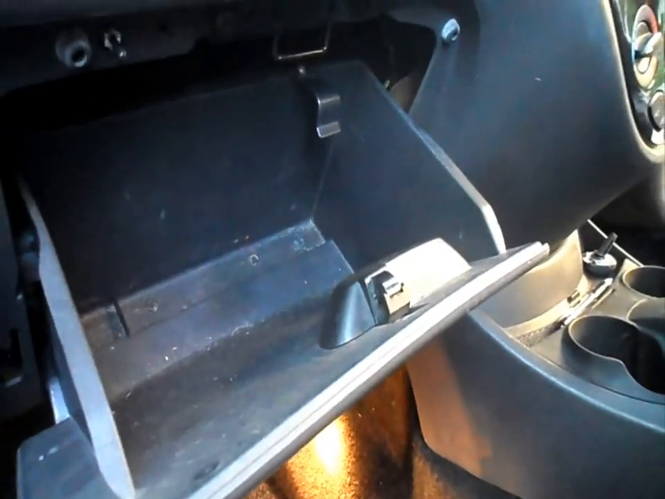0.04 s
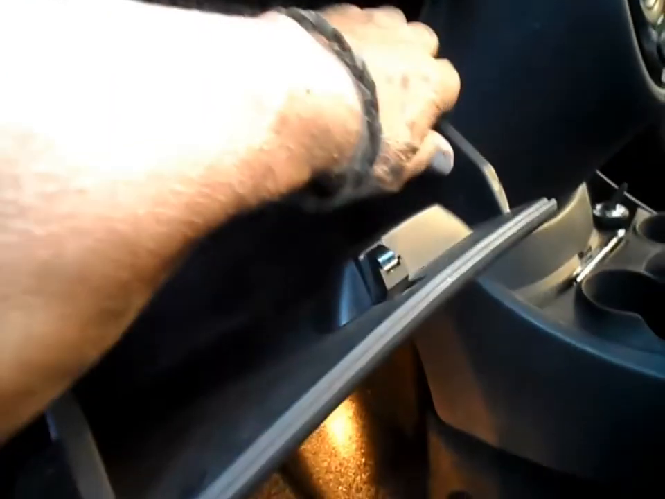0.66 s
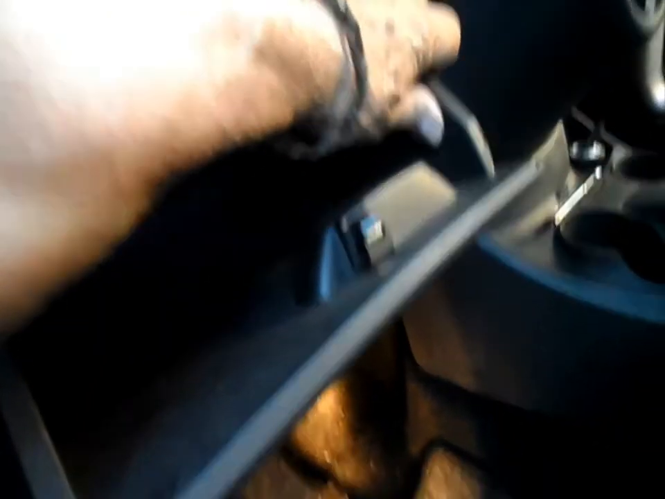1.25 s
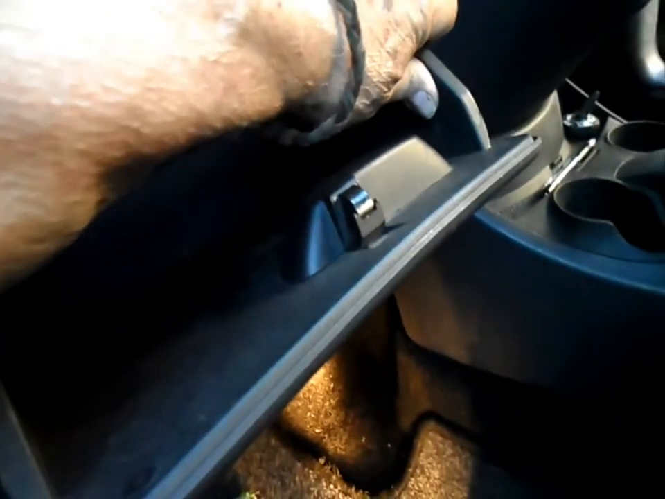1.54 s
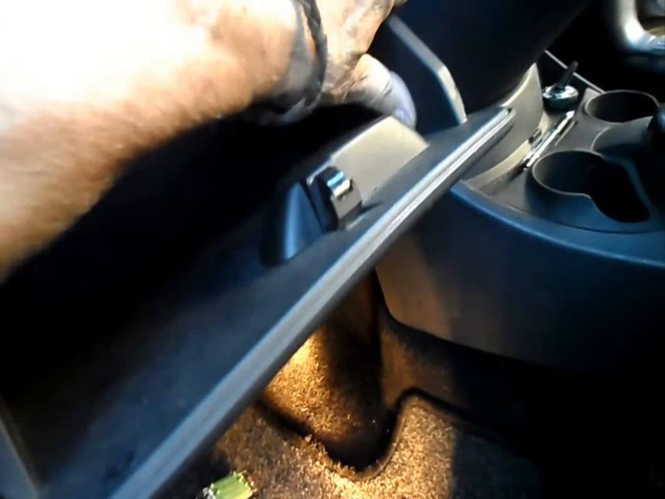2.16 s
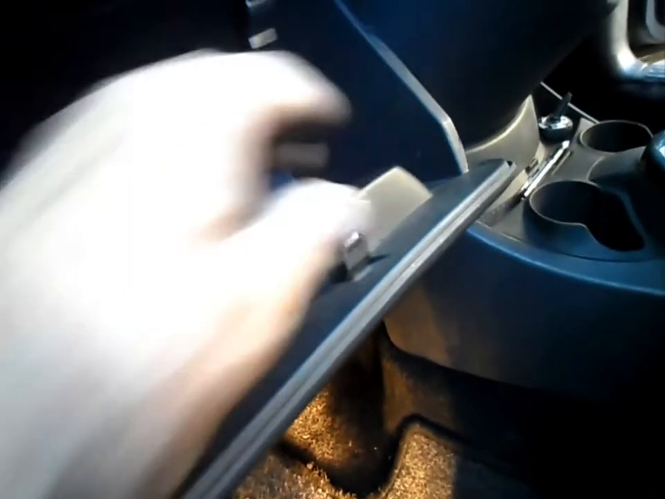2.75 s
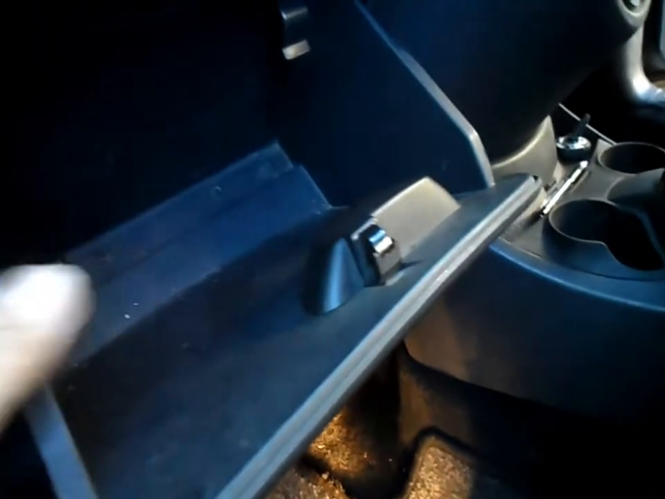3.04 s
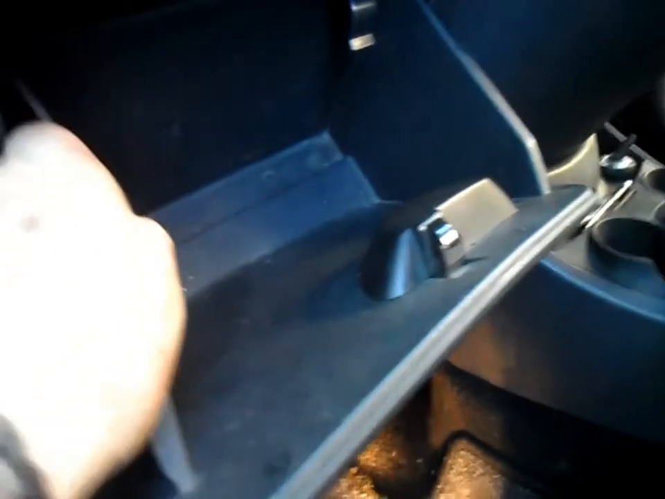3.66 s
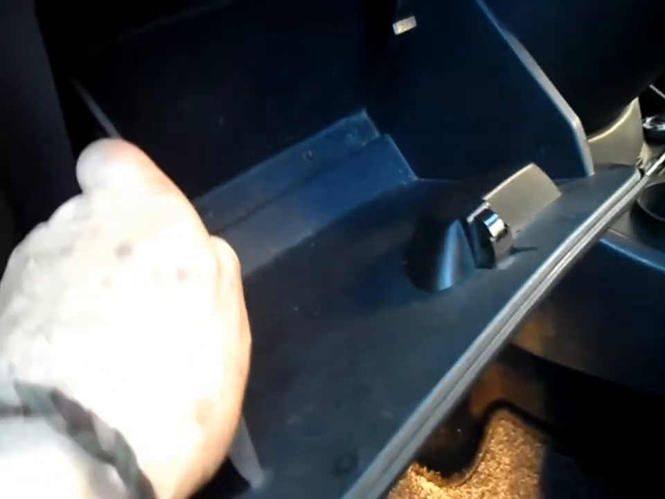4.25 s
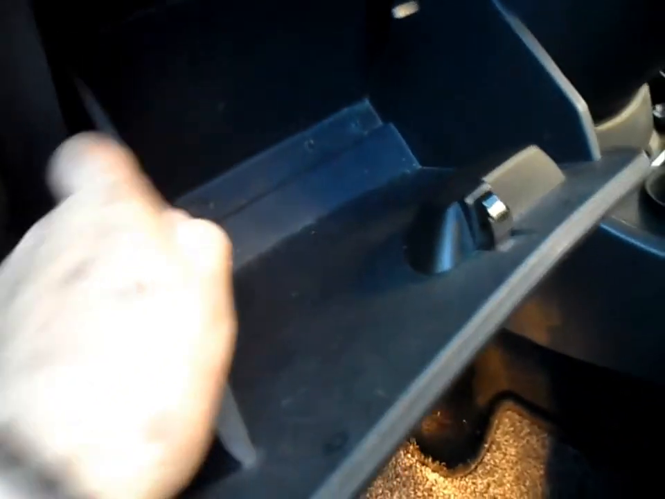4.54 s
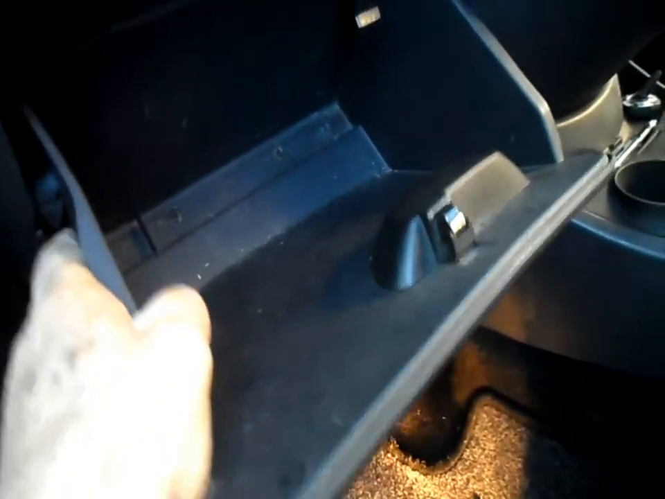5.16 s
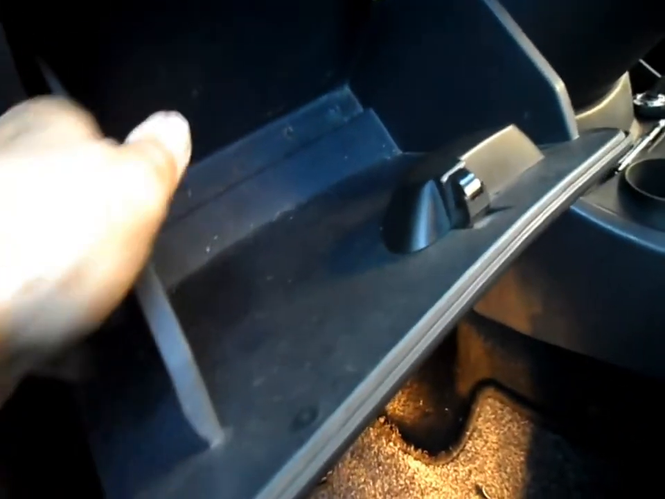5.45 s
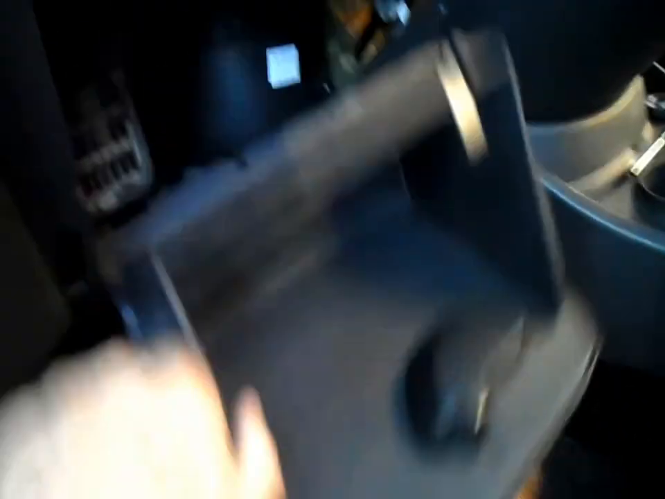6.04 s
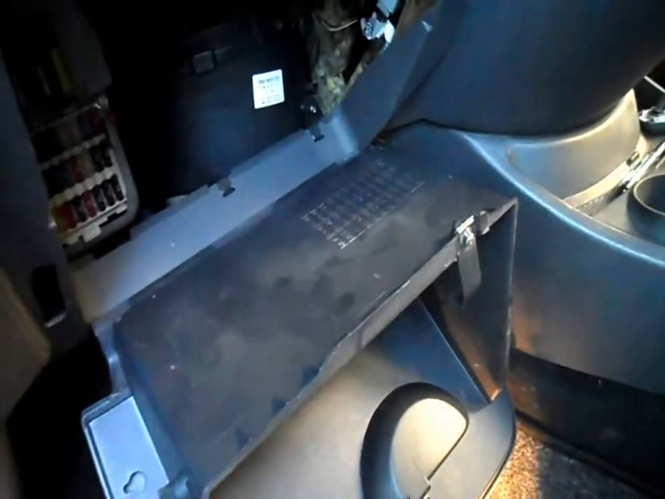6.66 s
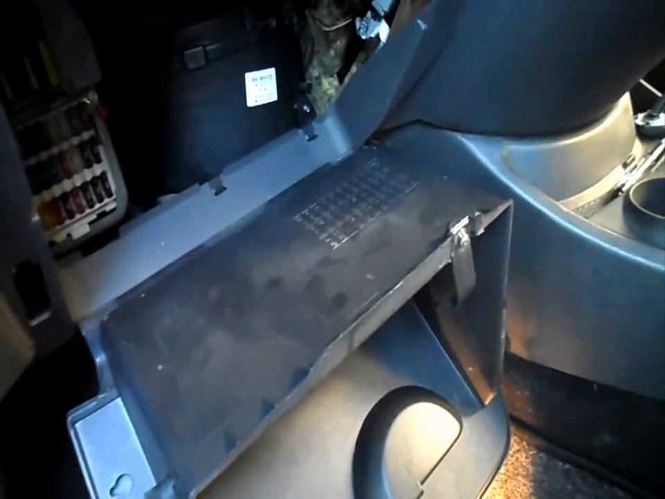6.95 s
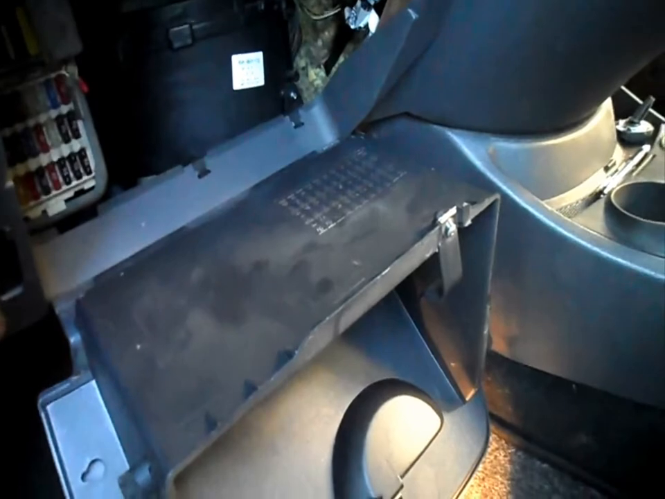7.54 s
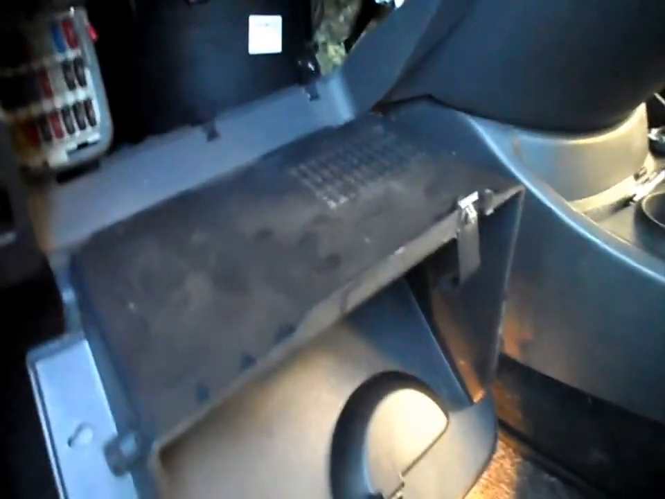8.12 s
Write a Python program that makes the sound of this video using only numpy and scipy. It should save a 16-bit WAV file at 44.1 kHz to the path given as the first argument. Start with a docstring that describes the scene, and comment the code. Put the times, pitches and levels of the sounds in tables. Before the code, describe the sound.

Inside a quiet car, fingers lightly tap, rub and push a hard plastic glovebox close to a hand-held microphone. One sharp, hollow knock comes as a stop snaps past the dashboard. More soft taps, scrapes and dull thumps follow, then the bin swings down and bangs twice in quick succession with a short boom. Faint rubbing and thin rustles remain over a low cabin rumble and hiss.

```python
"""Glovebox worked loose in a quiet car

Inside the cabin, on the microphone of a hand-held camera close to the hard plastic bin.
Fingers tap and rub it, one stop snaps past the dashboard, then the bin swings down and bangs twice.
Each blow cracks in the shell and sets the big panels booming; the gain control ducks after the bangs."""
import sys
import numpy as np
from scipy import signal
from scipy.fft import rfft, irfft, next_fast_len
from scipy.io import wavfile

SR = 44100
rng = np.random.default_rng(int(sys.argv[2]) if len(sys.argv) > 2 else 0)


def int16_out(signal):
    """Quantize to a 16-bit WAV file."""
    q = np.round(np.clip(np.atleast_2d(signal).T, -1, 1) * 32767)
    wavfile.write(sys.argv[1], SR, q.astype(np.int16))


N = 365629
T = np.arange(SR // 2) / SR
BLOW_S, BOOM_S = .015, .05  # opening spans that set the level of a blow and of a boom
# spectrum of sliding contact on plastic: frequency_hz, level_db
SLIDE_SPECTRUM = [(180, 4.5), (300, -9), (378, -3), (744, -4), (821, -9.5), (907, -4.5), (1300, -6),
                  (1490, -15), (2320, -12.5), (15500, -25.5)]


def undb(db):
    """Decibels to gain."""
    return 10 ** (np.asarray(db) / 20)


def unit(x, span_s=None):
    """Scale to rms 1, over the whole sound or its first span_s seconds."""
    head = x if span_s is None else x[:int(span_s * SR)]
    return x / np.sqrt(np.mean(head ** 2) + 1e-20)


def fade(t60, t=T):
    """Exponential decay, 60 dB down after t60 seconds."""
    return np.exp(-np.log(1000) * t / max(t60, 1e-3))


def add(out, start_s, x):
    """Mix x into out from start_s."""
    i = int(start_s * SR)
    out[i:i + len(x)] += x[:len(out) - i]


def shape(x, gain):
    """Filter x by a gain that is a function of frequency; rms 1."""
    size = next_fast_len(len(x))
    hz = np.maximum(np.fft.rfftfreq(size, 1 / SR), 1)
    return unit(irfft(rfft(x, size) * gain(hz), size)[:len(x)])


def colour(x, points):
    """Filter x by a curve through (Hz, dB) points; rms 1."""
    hz, db = np.transpose(points)
    return shape(x, lambda f: undb(np.interp(np.log(f), np.log(hz), db)))


def band_gain(hz, edges, order=3):
    """Gain of a band-pass at the frequencies hz."""
    return 1 / np.sqrt((1 + (edges[0] / hz) ** (2 * order)) * (1 + (hz / edges[1]) ** (2 * order)))


def band(x, edges):
    """The part of x between two edges in Hz; rms 1."""
    return shape(x, lambda f: band_gain(f, edges))


def walk(n, per_s):
    """n samples of random levels joined by straight lines."""
    return np.interp(np.arange(n) * per_s / SR, np.arange(256), rng.standard_normal(256))


def cabin(level_db=-55, waver_db=5.0, wavers_per_s=6):
    """The cabin's low rumble wavers under steady microphone hiss."""
    # spectrum of the quiet cabin: frequency_hz, level_db
    spectrum = [(12, -34.5), (20, 4.5), (66, -3), (148, -12.5), (225, -14.5), (259, -22), (342, -16),
                (372, -17), (597, -22), (649, -22), (1720, -29), (15500, -39.5)]
    air = colour(rng.standard_normal(N), spectrum)
    rumble = signal.sosfilt(signal.butter(2, 160, fs=SR, output="sos"), air[::-1])[::-1]
    rumble = signal.sosfilt(signal.butter(2, 160, fs=SR, output="sos"), rumble)  # both ways: in phase
    waver = undb(waver_db * walk(N, wavers_per_s))
    return undb(level_db) * unit(air + rumble * (waver - 1))


def handling(still_hand_db=-72):
    """The hand on the camera rumbles faintly, and more with each shift."""
    # the camera shifts in the hand: peak_s, level_db, swell_and_ebb_s
    shifts = [(.85, -51.5, 0.2), (1.95, -36.5, 0.13), (2.7, -42, 0.087), (6.6, -40.5, .06),
              (7.5, -51.5, .24)]
    t = np.arange(N) / SR
    swells = sum(undb(db) * np.exp(-np.abs(t - peak_s) / span_s) for peak_s, db, span_s in shifts)
    return (undb(still_hand_db) + swells) * band(rng.standard_normal(N), (24, 75))


def spot_gain(hz, spot_hz, lift=1.8, width=.1):
    """Each place of contact favours one resonance of the shell, at spot_hz."""
    return 1 + lift / (1 + (np.log(hz / spot_hz) / width) ** 2)


def shell(ring_scale, gain, scatter_db=4.5):
    """The plastic shell rings in modes weighted by gain(Hz) and by chance; high ones die sooner."""
    # modes of the shell: pitch_hz, level_db
    modes = [(285, -3.5), (334, 1.5), (398, -6.5), (458, 8), (598, -5.5), (775, -0.5), (937, 2), (1065, -3),
             (1190, -9.5), (1400, -1), (1530, -1), (1660, 1), (1920, -3), (2080, -12.5), (2270, -9.5),
             (2520, -13.5), (2710, -7), (3130, -6.5), (3730, -18.5), (3880, -10), (4090, -13.5), (4400, -7),
             (5540, -17.5)]
    weights = undb(scatter_db * rng.standard_normal(len(modes))) * rng.choice([-1, 1], len(modes))
    t = T[:SR // 8]
    out = np.zeros(len(t))
    for weight, (hz, db) in zip(weights, modes):
        t60 = 0.058 * ring_scale * (hz / 400) ** (-1 / 4)
        out += weight * gain(hz) * undb(db) * np.sin(2 * np.pi * hz * t) * fade(t60, t)
    return out


def boom(centre_hz, ring_scale, rise_s=0.00077, width_oct=0.85, trim_db=-9):
    """The bin flexes at a pitch set by how it is held; its panels and loose trim shake along."""
    # modes of the big panels and the air behind them: pitch_hz, level_db, base_t60_s
    modes = [(56.3, 5.5, 0.12), (70, 2.5, 0.16), (82, -5, 0.065), (125.3, -6, 0.37), (145.6, 1, 0.16),
             (176, -0.5, 0.2), (201.6, 2.5, .16)]
    flex = np.sin(2 * np.pi * centre_hz * T) * fade(.24 * ring_scale)
    panels = np.zeros(len(T))
    for k, (hz, db, t60) in enumerate(modes):
        weight = (-1) ** k * undb(db) / (1 + (np.log2(hz / centre_hz) / width_oct) ** 2)
        panels += weight * np.sin(2 * np.pi * hz * T) * fade(t60 * ring_scale)
    trim = band(rng.standard_normal(len(T)), (centre_hz / 3, 210)) * fade(0.19 * ring_scale)
    swing = unit(flex, BOOM_S) + unit(panels, BOOM_S) + undb(trim_db) * unit(trim, BOOM_S)
    return unit(swing * (1 - np.exp(-T / rise_s)), BOOM_S)


def knock(boom_db, hollow_db, clack_db, tick_db, boom_hz, ring_scale, spot_hz,
          echo_db=-27, echo_t60=0.24, rebound=0.42, rebound_s=.0032):
    """A blow on the bin: a double crack, the shell's ring, a trace of cabin echo and the boom."""
    # spectrum of the shell's many overlapping modes: frequency_hz, level_db
    spectrum = [(150, -32), (260, 0), (481, -2.5), (622, -13.5), (1080, -6.5), (1300, -11.5), (1770, -21.5),
                (1920, -14), (2100, -25.5), (2320, -17), (2950, -25), (3810, -26.5), (5190, -29.5),
                (5650, -33), (15500, -49.5)]
    # hollow, clack and tick ranges of a blow: low_hz, high_hz
    bands = [(230, 650), (650, 2200), (2200, 16000)]
    levels_db = (hollow_db, clack_db, tick_db)
    base_t60s, mode_shares = (.05, .024, .023), (.95, .75, .35)
    dense_modes = colour(rng.standard_normal(len(T)), spectrum)
    # a soft finger makes little tick and pushes for longer than hard plastic
    softness_db = np.clip(max(hollow_db, clack_db) - tick_db, 0, 20)
    push_s = 0.00058 * undb(softness_db)
    onset = 1 - np.exp(-T / push_s)
    out = undb(boom_db) * boom(boom_hz, ring_scale)
    for edges, db, t60, mode_share in zip(bands, levels_db, base_t60s, mode_shares):
        gain = lambda f: band_gain(f, edges) * spot_gain(f, spot_hz)
        decay = fade(t60 * ring_scale)
        add(decay, rebound_s, rebound * decay)  # the loose bin touches again
        echo = undb(echo_db) * band(dense_modes, edges) * fade(echo_t60)
        crack = unit(shape(dense_modes, gain) * decay + echo, BLOW_S)
        add(crack, 0, mode_share * unit(shell(ring_scale, gain), BLOW_S))
        out += undb(db) * unit(crack * onset, BLOW_S)
    return out


def band_levels(db, treble_db, spot_hz, even_hz, lean_db_per_oct):
    """Low, middle and high dB of a contact: its place tips low against middle, hardness sets the top."""
    lean_db = np.clip(lean_db_per_oct * np.log2(spot_hz / even_hz), -18, 14)
    return db - max(lean_db, 0), db + min(lean_db, 0), db + treble_db


def rub(length_s, db, hiss_db, spot_hz, slips_per_s=600, spread_db=4.0, uneven_db=2, grips_per_s=55):
    """Tiny slips swell and ebb as the contact slides and catches, and stir the shell."""
    # low, middle and hiss ranges of a rub: low_hz, high_hz
    bands = [(250, 800), (800, 2500), (2500, 16000)]
    n = int(max(length_s, .01) * SR)
    total = n + SR // 10
    pressure = np.zeros(total)
    pressure[:n] = signal.windows.tukey(n, .9) * undb(uneven_db * walk(n, grips_per_s))
    slipping = rng.random(total) < slips_per_s / SR
    sizes = undb(spread_db * np.minimum(rng.exponential(size=total), 4))
    slips = slipping * sizes * rng.choice([-1, 1], total)
    force = pressure * (slips + 0.27 * rng.standard_normal(total))
    ringing = unit(signal.fftconvolve(force, shell(1, np.ones_like))[:total])
    scrape = colour(force, SLIDE_SPECTRUM) + 0.47 * ringing
    # a moving contact favours a broader range than a blow does
    scrape = shape(scrape, lambda f: spot_gain(f, spot_hz, lift=1, width=.19))
    levels_db = band_levels(db, hiss_db, spot_hz, even_hz=1110, lean_db_per_oct=10)
    return sum(undb(level) * unit(band(scrape, edges), n / SR) for edges, level in zip(bands, levels_db))


def taps(boom_db=-17, skid_db=-8.5, graze_s=.004):
    """Light contacts, mostly fingers, knock the shell; one that does not stop at once skids on."""
    # contacts on the bin: start_s, level_db, tick_over_level_db, spot_hz, skid_s
    contacts = [(.05, -65, -9, 600, 0.0037), (0.672, -50.5, 1, 690, 0.014), (0.712, -53, 8, 2670, 0.0011),
                (.888, -42, -29, 748, 0.049), (1.208, -57.5, -1.5, 450, 0.021),
                (1.434, -54.5, -14.5, 337, 0.011), (1.815, -45, -41, 419.7, 0.055),
                (1.965, -50, -4, 610, 0.075), (2.109, -41, -18.5, 481, 0.045),
                (2.287, -52, -11, 374, 0.0022), (2.365, -57, -28, 780, 0.0013), (2.686, -32.5, -27, 416, 0),
                (2.819, -40, -17.5, 450, 0.066), (3.131, -41.5, -24, 355, 0.093),
                (3.192, -40, -16, 518.3, 0.0087), (3.331, -39.5, -19, 415, 0.086),
                (3.43, -50, -12, 429.4, 0.0012), (3.759, -42.5, -46, 794, 0.051),
                (3.996, -64, 2.5, 617, 0.022), (4.674, -48.5, -6.5, 533, 0), (4.841, -45, -6, 486, 0.011),
                (4.941, -40, -19, 340.4, 0), (5.164, -48.5, -11.5, 670, 0), (6.609, -60.5, -9, 540, 0),
                (6.645, -74, 10, 2790, 0), (7.319, -73.5, 7.5, 3104, 0.0063)]
    out = np.zeros(N)
    for start_s, db, hardness_db, spot_hz, skid_s in contacts:
        levels_db = band_levels(db, hardness_db, spot_hz, even_hz=640, lean_db_per_oct=29.5)
        add(out, start_s, knock(db + boom_db, *levels_db, boom_hz=77.1, ring_scale=1, spot_hz=spot_hz))
        if skid_s > 0:
            hiss_db = 0.47 * hardness_db - 0.5  # harder taps skid with more hiss
            add(out, start_s - graze_s, rub(skid_s, db + skid_db, hiss_db, spot_hz * 1.01))
    return out


def fidgets(count=16, ring_t60=0.07):
    """While the hand is on the bin, fingertips leave faint ticks at odd moments."""
    out = np.zeros(N)
    for start_s, db, spot_hz in rng.uniform((.1, -68, 900), (6, -60, 3200), (count, 3)):
        friction = colour(rng.standard_normal(len(T)), SLIDE_SPECTRUM)
        tick = shape(friction, lambda f: band_gain(f, (800, 16000)) * spot_gain(f, spot_hz))
        add(out, start_s, undb(db) * unit(tick * fade(ring_t60), BLOW_S))
    return out


def thumps():
    """The panels boom with a dull thump, some under a tap landing at the same moment, some under a soft push of
    the hand; higher ones ring longer."""
    # panel booms, alone or under a tap at the same moment: start_s, level_db, boom_hz
    flexes = [(.673, -48, 117.5), (.89, -45.5, 94), (1.431, -57, 121.1), (1.818, -39, 171.7),
              (1.844, -42, 64), (1.893, -38, 84), (1.965, -43, 66), (2.144, -44.5, 82.6), (2.685, -40, 65),
              (3.129, -37, 195.2), (3.337, -34.5, 103.1), (3.43, -47.5, 76), (3.764, -49, 146.2),
              (4.84, -56, 143.9), (4.941, -40, 138.4), (5.672, -48.5, 138.6), (7.261, -48, 55),
              (7.471, -44.5, 60), (7.596, -44.5, 56)]
    out = np.zeros(N)
    for start_s, db, boom_hz in flexes:
        ring_scale = 0.87 + 0.31 * np.log2(boom_hz / 100)
        add(out, start_s, undb(db) * boom(boom_hz, ring_scale, rise_s=0.002))
    return out


def rubs():
    """Skin, sleeve and plastic slide on the bin and trim."""
    # sliding strokes: start_s, end_s, level_db, hiss_over_level_db, spot_hz
    strokes = [(.681, 0.749, -54, -14.5, 1300), (1.035, 1.212, -57.5, -14.5, 630),
               (1.262, 1.315, -56, -25, 1000), (2.146, 2.217, -74, 9, 370), (2.686, 2.781, -50, -12, 399),
               (2.765, 2.813, -55, -16, 1200), (2.801, 2.843, -46.5, -17, 730),
               (3.141, 3.184, -50.5, -26, 1250), (3.227, 3.309, -76, 11.5, 400),
               (3.437, 3.565, -53.5, -12, 650), (3.539, 3.632, -55.5, -18, 384),
               (3.602, 3.728, -60, -14.5, 1040), (3.794, 3.896, -65.5, -15, 885),
               (4.457, 4.52, -64.5, -6, 920), (4.83, 4.884, -50.5, -12.5, 2400),
               (4.863, 4.982, -55.5, -10, 800), (5.143, 5.263, -59, -0.5, 1360),
               (5.272, 5.422, -56.5, -5, 870), (5.426, 5.706, -66, 0.5, 1010),
               (5.642, 5.943, -65, -8, 1050), (6.264, 6.472, -52, -10.5, 900), (6.334, 6.4, -50, -32, 1170),
               (6.468, 6.553, -62, 1, 600), (7.002, 7.147, -68.5, -3, 1880),
               (7.134, 7.231, -74.5, 8.5, 700)]
    out = np.zeros(N)
    for start_s, end_s, db, hiss_db, spot_hz in strokes:
        add(out, start_s, rub(end_s - start_s, db, hiss_db, spot_hz))
    return out


def bangs():
    """The bin hits its stops and rebounds."""
    # blows on the stops: start_s, boom_db, hollow_db, clack_db, tick_db, boom_hz, ring_scale, spot_hz
    blows = [(2.597, -26, -24, -28.5, -34.5, 85.5, 1.2, 1400),
             (6.175, -18, -20, -21, -24, 134.3, 1.25, 1450), (6.433, -18.5, -20, -26, -25, 131.3, 1.1, 324),
             (6.452, -34, -38, -42, -36, 64, 1.5, 695)]
    out = np.zeros(N)
    for start_s, *blow in blows:
        add(out, start_s, knock(*blow))
    return out


def rustles(snap=0.9, snap_t60=0.02):
    """Right by the microphone, a thin, high hiss starts with a snap and dies away."""
    # bursts of rustling: start_s, decay_s, level_db
    bursts = [(7.633, 0.091, -56), (7.78, 0.15, -66), (8.115, 0.019, -56.5)]
    out = np.zeros(N)
    for start_s, decay_s, db in bursts:
        hiss = colour(rng.standard_normal(len(T)), [(5600, -18), (6500, 0), (15000, -6)])
        envelope = np.exp(-(T / decay_s) ** 2) + snap * fade(snap_t60)
        add(out, start_s, undb(db) * hiss * envelope)
    return out


def scene():
    """The bin and the hands at close range over the quiet cabin, in mono."""
    background = cabin() + handling()
    return (background + bangs() + thumps() + rubs() + rustles() + taps() + fidgets())[None]


def record(dry, threshold_db=-21, attack_s=0.006, recover_db_per_s=4.5, top_hz=15850):
    """The camera's gain control drops quickly on a bang and creeps back; the top is cut."""
    pole = np.exp(-1 / (attack_s * SR))
    power = signal.lfilter([1 - pole], [1, -pole], dry[0] ** 2)
    over_db = np.maximum(10 * np.log10(power + 1e-12) - threshold_db, 0)
    ramp_db = recover_db_per_s * np.arange(N) / SR
    duck_db = np.maximum.accumulate(over_db + ramp_db) - ramp_db
    top_cut = signal.ellip(10, .2, 70, top_hz, fs=SR, output="sos")
    return signal.sosfilt(top_cut, dry * undb(-duck_db))


dry = scene()
out = record(dry)
int16_out(out)
```